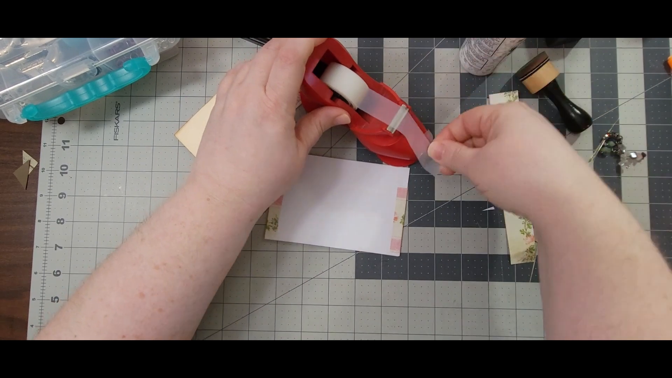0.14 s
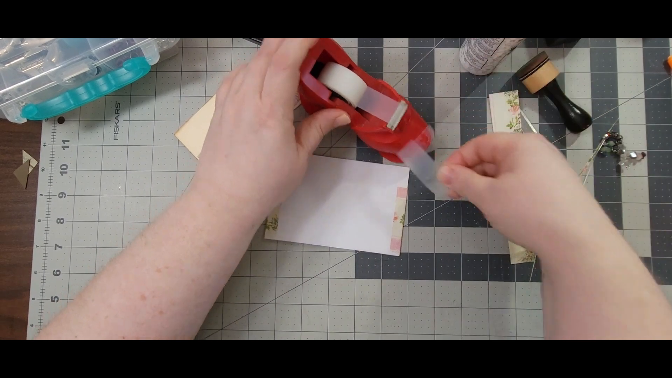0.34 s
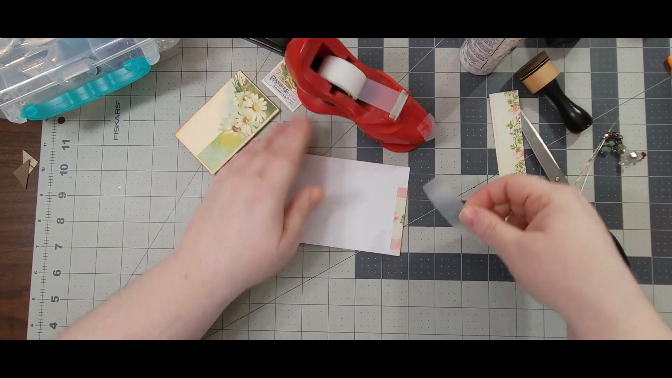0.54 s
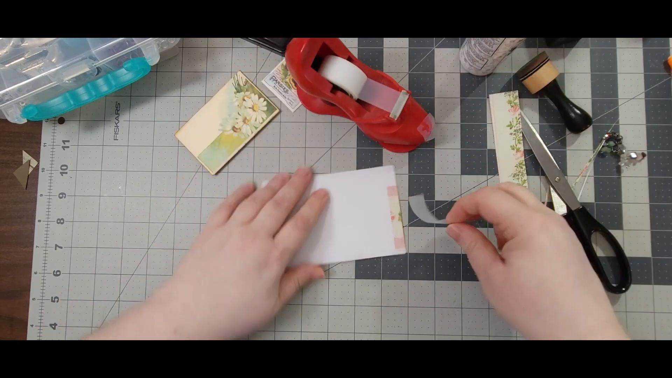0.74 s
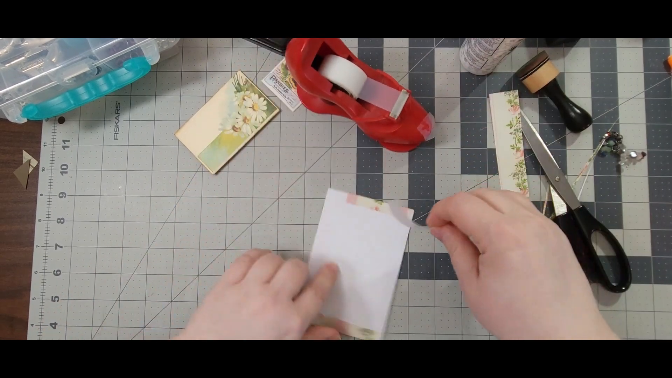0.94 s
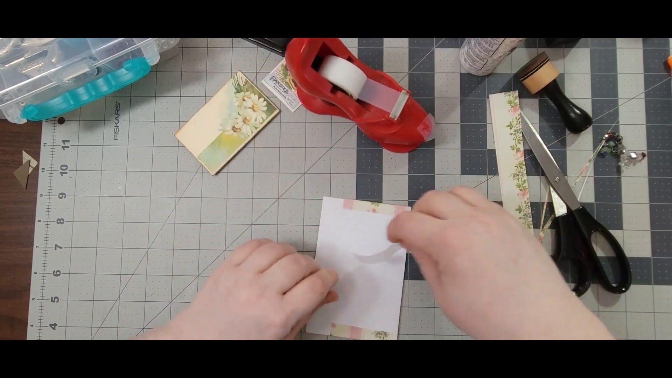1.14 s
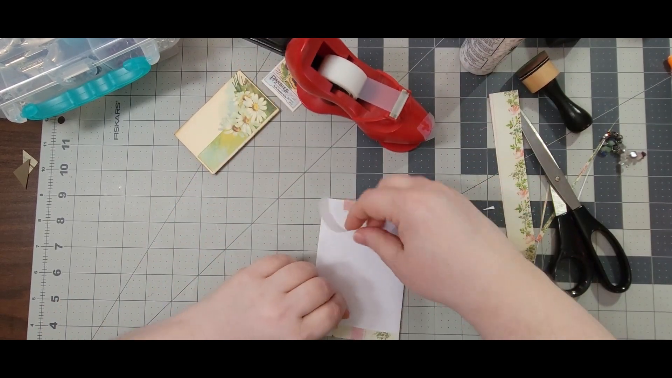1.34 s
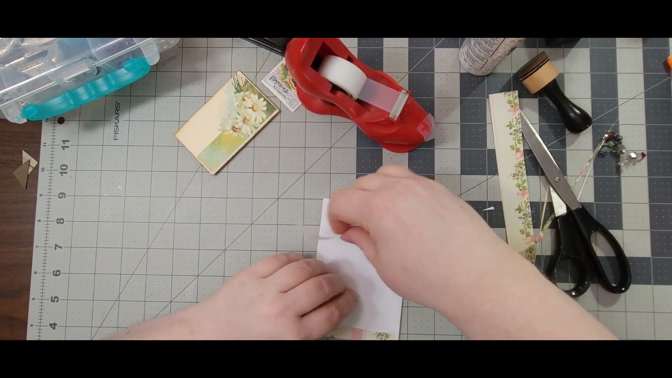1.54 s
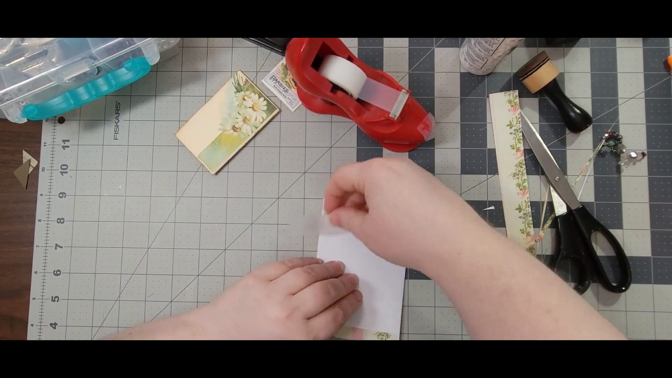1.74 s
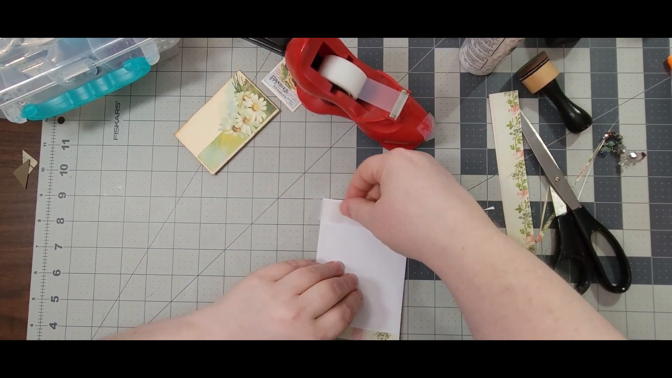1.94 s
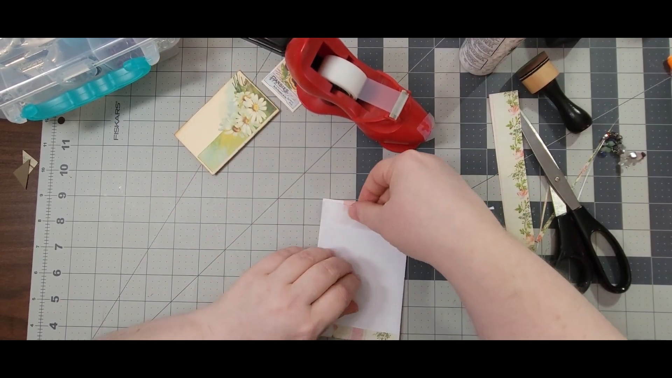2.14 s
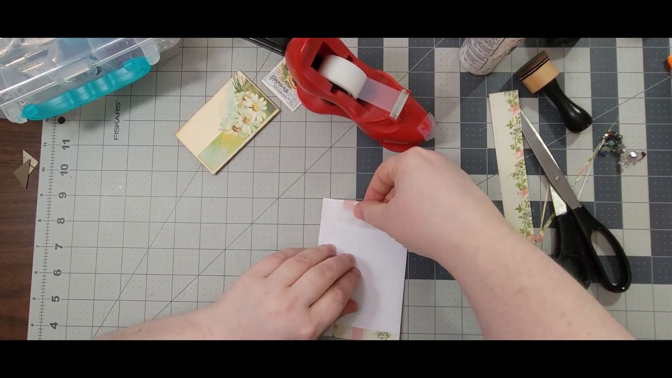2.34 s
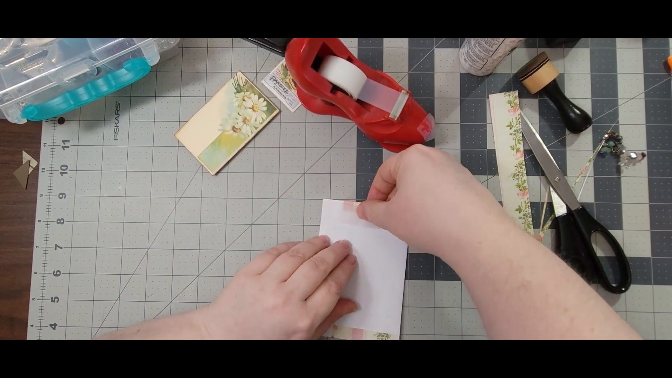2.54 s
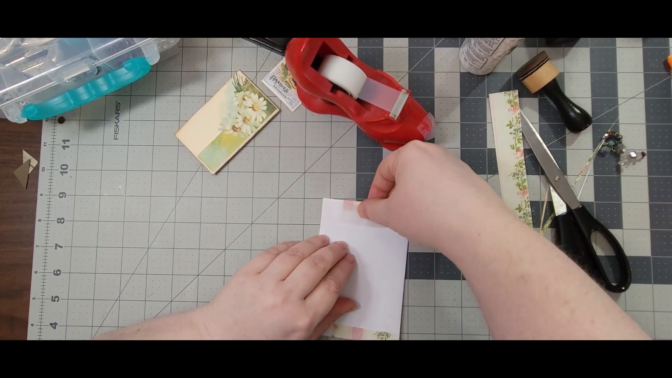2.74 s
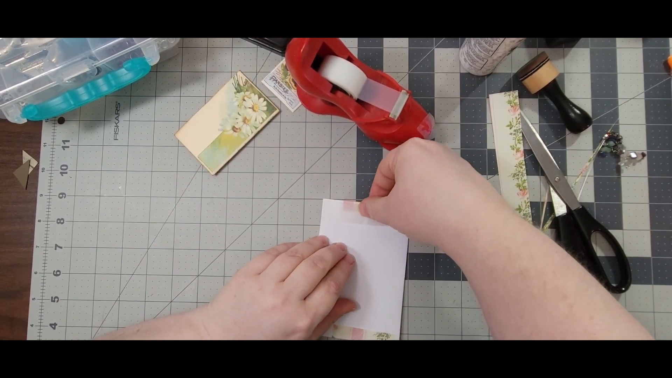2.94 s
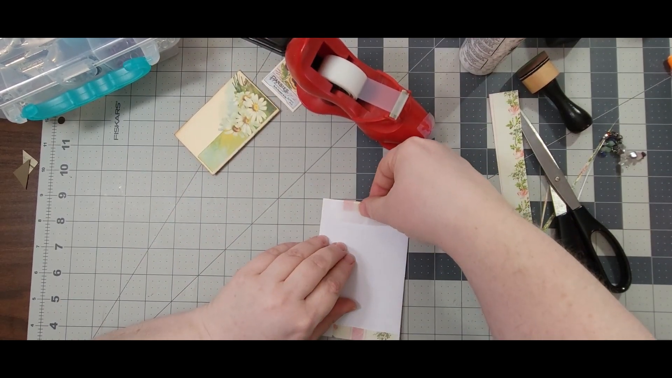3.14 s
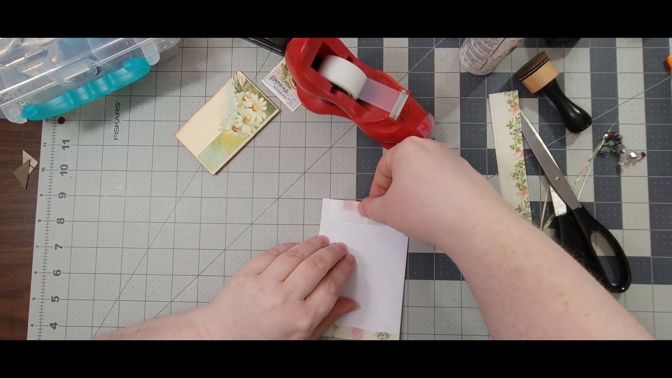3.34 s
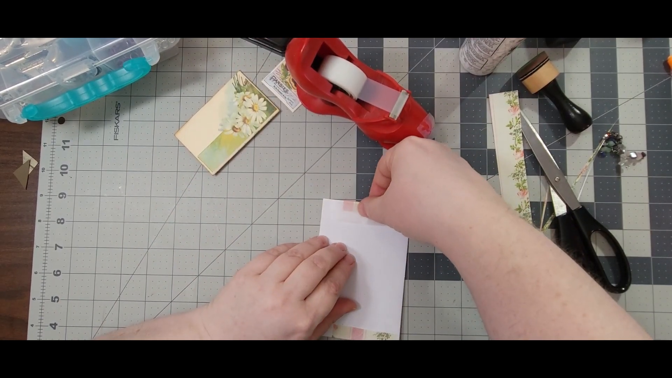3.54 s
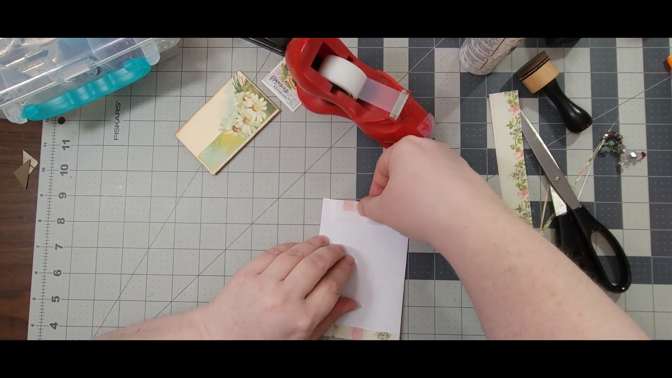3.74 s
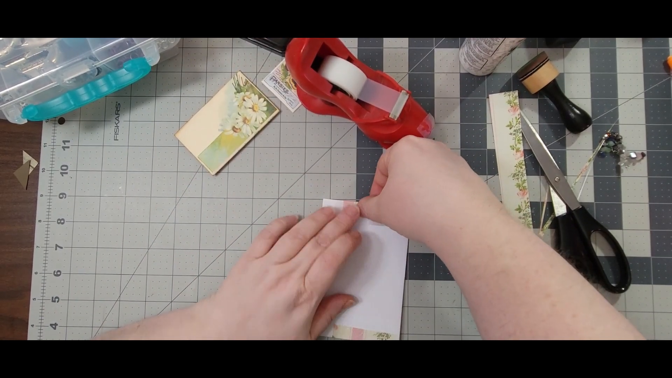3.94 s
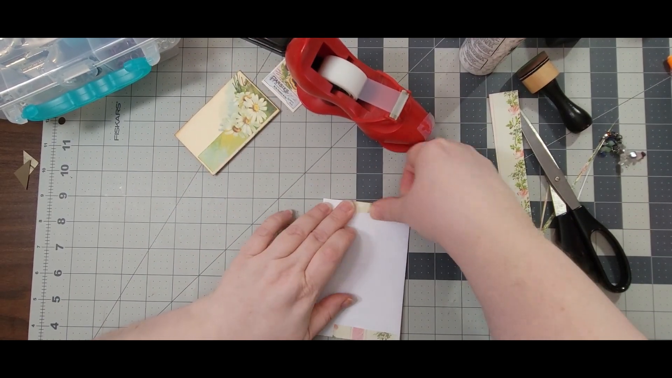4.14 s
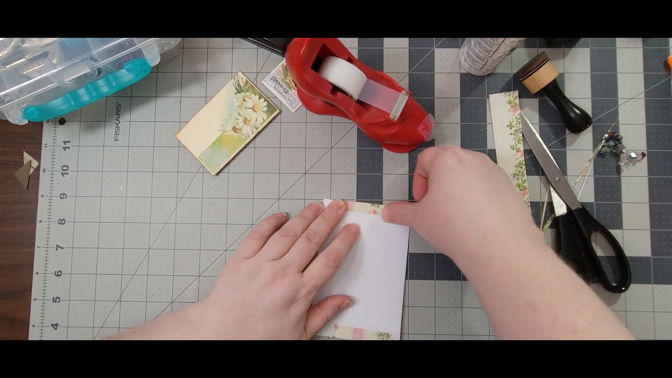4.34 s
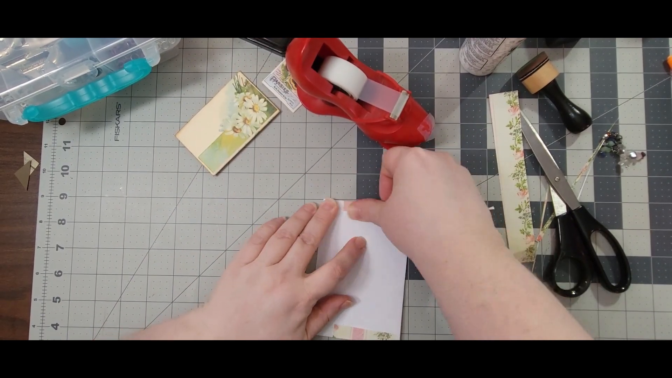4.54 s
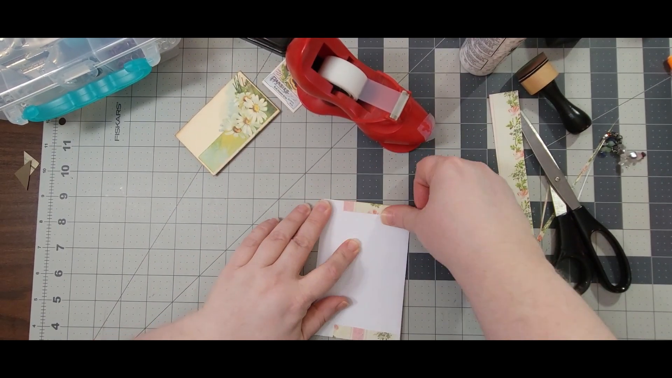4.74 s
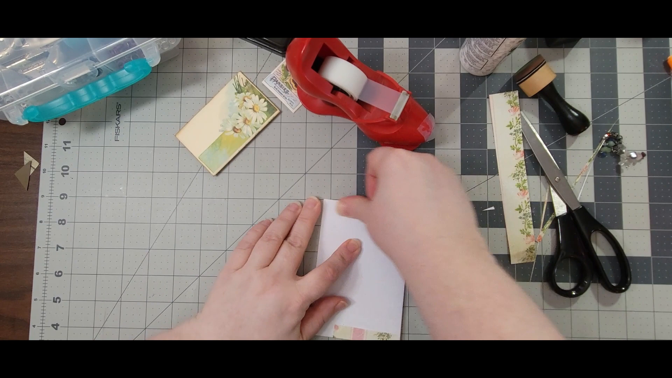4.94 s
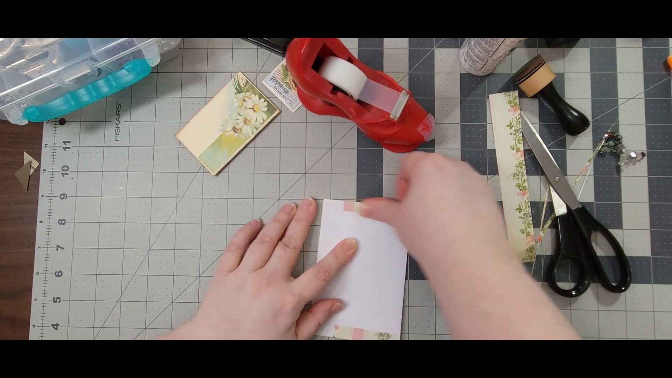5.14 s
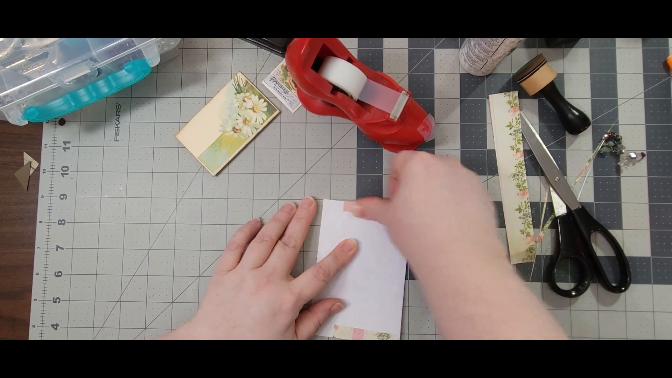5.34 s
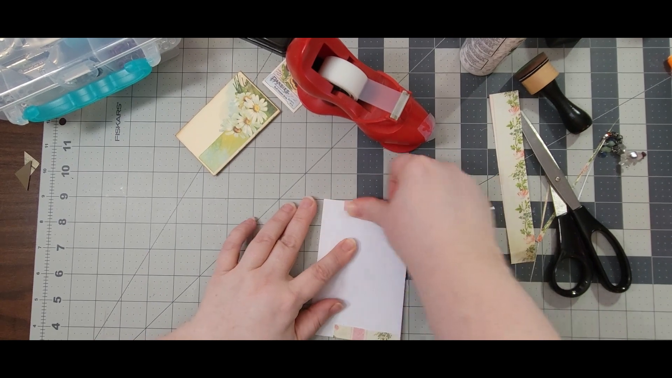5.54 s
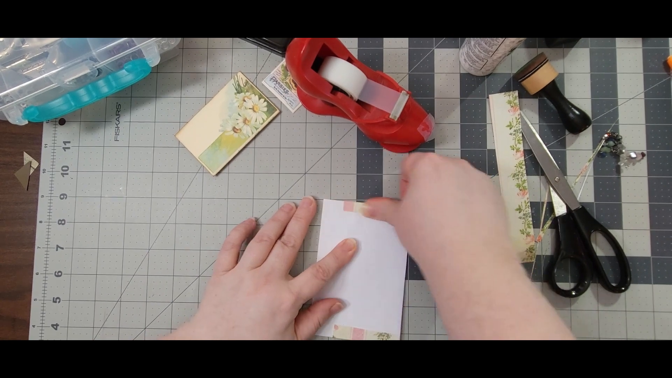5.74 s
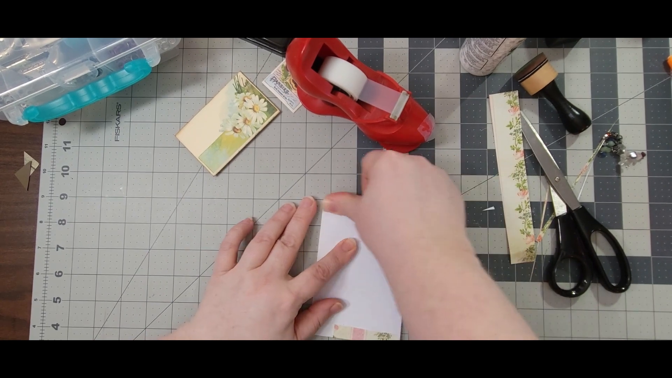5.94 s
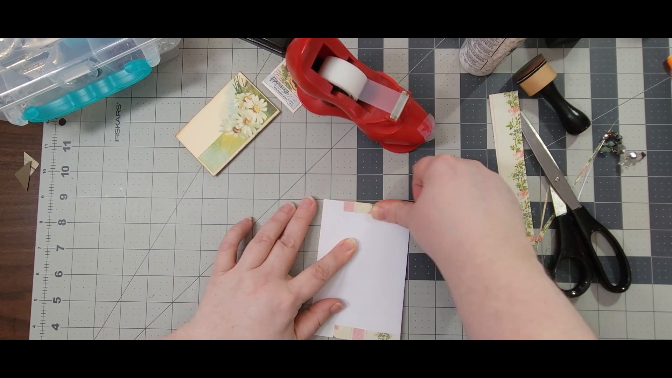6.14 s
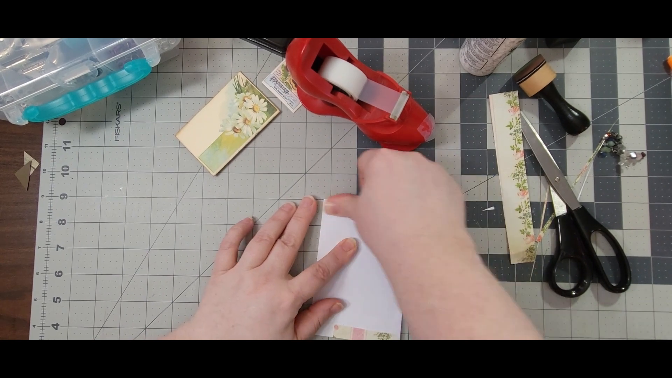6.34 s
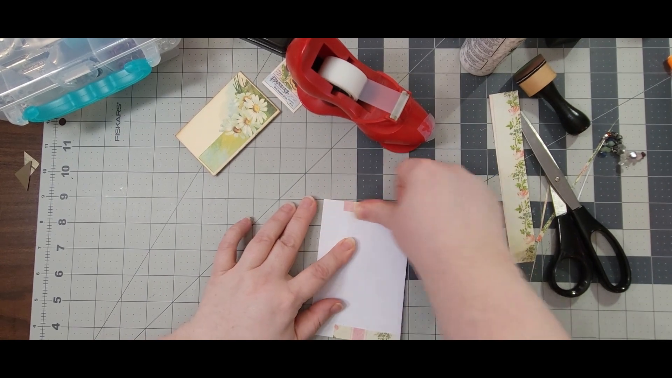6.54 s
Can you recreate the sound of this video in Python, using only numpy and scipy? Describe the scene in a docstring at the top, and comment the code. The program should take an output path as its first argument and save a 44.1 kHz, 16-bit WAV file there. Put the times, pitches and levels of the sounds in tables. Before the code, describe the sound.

In a small room with a steady low hum, tape is tugged and torn from a plastic dispenser with a loud bright crackle. A firm table knock follows, then card hisses across a mat. Thin film rustles and ticks between fingers, one sharp snap sounds midway, and a thumb rubs the tape in soft quick strokes with dull little bumps. Close stereo microphone; the level dips after loud peaks.

```python
"""A hum fills a small room, and at once tape is tugged and torn off a plastic desk dispenser with a sharp crackle.
A card is slid and turned on a cutting mat, then the strip is laid on it and rubbed down with a thumb.
Rubbing, rustling and tearing are noise shaped in pitch and loudness; snaps are very short bursts of noise.
Bumps are pushes that ring the table top; the appliance is wavering tones plus fan noise.
The recorder turns itself down after loud peaks and recovers slowly."""
import sys
import numpy as np
from scipy import signal
from scipy.fft import rfft, irfft, next_fast_len
from scipy.io import wavfile

SR = 44100
rng = np.random.default_rng(int(sys.argv[2]) if len(sys.argv) > 2 else 0)


def bounce(signal):
    """Save signal as a 16-bit WAV file at the path given by the first command-line argument."""
    frames = np.transpose(np.atleast_2d(signal))
    limited = np.clip(frames, -1, 1)
    pcm = np.round(limited * 32767).astype(np.int16)
    wavfile.write(sys.argv[1], SR, pcm)


N = 290597

# motor tones: (pitch [Hz], level [dB])
HUM_TONES = [(59.2, -38.5), (120, -33), (296, -58.5)]
# fan noise: (frequency [Hz], relative level per Hz [dB])
FAN_SPECTRUM = [(15, -61), (30, -40), (45, -17.5), (80, -13.5), (120, -11.5), (150, -25), (330, -33.5),
                (560, -42.5), (780, -52), (1050, -48.5), (1400, -50), (1950, -52), (2250, -66.5),
                (4500, -69.5), (7500, -79.5), (11000, -77.5), (12000, -69.5), (16000, -75)]
# casing resonances in the fan noise: (frequency [Hz], width of each of two filters [Hz], level [dB])
CASING_RESONANCES = [(220, 10, -63), (388, 20, -68), (441, 14, -68), (645, 20, -73), (900, 40, -72),
                     (1030, 50, -75), (1670, 110, -65), (1340, 40, -80), (1860, 50, -82), (2330, 40, -86),
                     (3285, 70, -83), (3620, 350, -82), (9200, 1100, -84)]
# how alike the noise is left and right: (frequency [Hz], likeness [-1 to 1])
EAR_LIKENESS = [(60, .99), (130, .975), (290, .85), (640, .8), (1400, .3), (3100, .1), (6800, -.1),
                (15000, .05)]
# rustles of the strip between fingers:
# (peak time [s], level [dB], duller part compared with it [dB], rise [dB/s], fall [dB/s])
RUSTLES = [(.035, -61, -8, 350, 198), (.165, -56.5, -4.5, 300, 100.5), (1.08, -61, -1, 405, 122),
           (1.174, -37, -10, 1500, 497.5), (1.308, -56, -5.5, 143, 331), (1.385, -73.5, 2, 200, 91.5),
           (1.51, -62, -7, 248.5, 60), (1.568, -46, -3, 900, 500), (1.61, -63.5, -7, 300, 118),
           (1.703, -44.5, -15.5, 412, 598), (1.799, -47, -7, 500, 350.5), (1.87, -48, -14.5, 250, 349.5),
           (1.96, -53.5, -6, 144, 119.5), (2.125, -64, 0, 202, 129), (2.335, -59.5, -12.5, 140.5, 97),
           (2.46, -46, -17.5, 333.5, 260.5), (3.79, -57.5, -9, 331, 200), (3.984, -40, -5.5, 1208, 698),
           (4.03, -43, -7, 596, 896), (4.045, -18, -18.5, 5000, 455), (4.101, -53.5, -6, 603, 64),
           (4.225, -50.5, -9, 107, 204.5), (4.3, -72, -23, 1503, 502)]
# bright noise of bending film: (frequency [Hz], relative level per Hz [dB])
FILM_SPECTRUM = [(4120, -64.5), (7000, -13.5), (8970, 6.5), (10600, -2.5), (12500, 4), (15000, -1.5),
                 (15600, 3)]
# hands bumping or scuffing the table: (time [s], level [dB], contact spread [s], brightness [Hz])
TABLE_BUMPS = [(.045, -30, .0006, 1200), (.21, -26, .015, 1200), (.4505, -6, .0003, 1500),
               (.4575, -16, .0002, 1200), (.469, -17, .001, 900), (.546, -36, .005, 1000),
               (.77, -38, .005, 800), (.935, -40, .008, 1600), (.958, -33, .009, 1100),
               (2.5, -46, .03, 2000), (3.79, -40, .018, 550), (4.377, -37, .007, 800),
               (4.475, -46, .012, 2200), (5.36, -45, .012, 2200), (5.982, -35, .009, 2200),
               (6.25, -46, .012, 2200), (4.452, -40, .02, 500), (4.87, -32, .009, 520),
               (5.06, -39, .007, 400), (5.775, -40, .01, 500), (5.99, -35, .014, 650),
               (6.02, -36, .016, 800), (6.215, -40, .02, 600), (6.467, -28, .007, 380),
               (6.478, -48, .012, 1600)]
# ringing modes of the table top: (frequency [Hz], relative level [dB], time to fall by 60 dB [s])
TABLE_MODES = [(112, 0, .075), (200, -5, .05), (290, -4, .035), (370, -1, .035), (480, 0, .03),
               (620, -6, .03), (950, -11, .03), (1320, -11, .03), (1600, -14, .03)]
# sticky snaps of tape and card:
# (time [s], level [dB], crack above [Hz], mid part compared with it [dB], spread [s], left-right [dB])
STICKY_SNAPS = [(0.0456, -17.5, 3850, 0.5, 0.0064, -1.5), (.12, -50, 4460, 18, 0.0034, -4),
                (0.188, -14, 6200, -19, 0.0055, 8), (0.1893, -10, 6200, -3, 0.0015, 6),
                (0.192, -7, 10400, -2, 0.0018, -5), (0.1927, 3.5, 7400, -16, 0.0024, -6),
                (0.2005, 3, 10500, -2, 0.0013, 15), (0.204, 3.5, 6070, -2, 0.0028, -4),
                (0.2231, -2, 9000, -3, 0.0015, -15), (0.2301, -5, 5000, -8, 0.0015, -7),
                (0.383, -34.5, 4500, 12.5, 0.0096, 2), (.4014, -36, 8000, -8, 0.0028, 1),
                (0.449, -17.5, 5760, 3.5, 0.01, -2.5), (0.507, -32.5, 6000, 2, 0.0022, -2),
                (0.527, -18.5, 4000, -19, 0.0012, -1), (0.543, -26, 4500, 2, 0.01, 2.5),
                (0.639, -47, 4500, -4, 0.0034, -16), (0.696, -29, 6000, -4, 0.001, -9),
                (0.91, -22.5, 9100, 0, 0.0073, 2), (1.175, -22.5, 4470, -8, 0.006, 0),
                (1.205, -45, 4500, 1, .006, 0), (1.569, -23, 7000, -10, 0.0047, 0),
                (1.8027, -34.5, 4470, -7.5, 0.0025, 7), (3.8, -45.5, 4420, -15.5, 0.0093, 5.5),
                (3.985, -22.5, 6500, -15, 0.0046, 3.5), (4.0414, -2, 8500, -21, .0003, 1),
                (4.0422, -11, 9800, -25, .0004, 0), (4.044, -17, 8300, -20, .0005, 0),
                (4.0462, -17, 8300, -25, .0004, 0), (4.0493, -21, 8300, -20, .0005, 0),
                (4.7108, -19, 6000, -24, .002, -2), (5.112, -32.5, 7100, -18, 0.0027, -4),
                (5.35, -40, 3520, -14, .004, 0), (5.408, -37, 3500, -5, .003, 0),
                (5.538, -32.5, 6600, -12, 0.003, 0), (5.98, -41.5, 3480, 6.5, 0.008, 3)]
# tiny high ticks of film peeling off skin: (time [s], level [dB])
PEEL_TICKS = [(1.699, -32), (1.707, -35), (1.778, -29), (1.788, -33), (1.796, -33), (1.809, -32),
              (1.848, -33), (1.857, -34), (1.873, -30), (1.881, -32)]
# sound shared by all ticks: (crack above [Hz], mid part compared with it [dB], spread [s], left-right [dB])
PEEL_TICK_SOUND = (10000, -22, .0015, 0)
# tape pulled against the teeth, a first tug and the rip:
# (time [s], length [s], crackle level [dB], dispenser ring level [dB])
TEARS = [(0.047, 0.0051, -41.5, -30.5), (0.191, 0.044, -6.5, -16)]
# ringing of the hollow dispenser: (frequency [Hz], width of the narrower filter [Hz], relative level [dB])
DISPENSER_RESONANCES = [(480, 100, -13), (650, 90, -5), (1178, 140, -1), (1660, 120, 6), (2540, 300, -4),
                        (3500, 260, 0), (4350, 300, -9), (5400, 450, -1)]
# noise of tearing film: (frequency [Hz], relative level per Hz [dB])
CRACKLE_SPECTRUM = [(1760, -39.5), (3000, -3), (4410, -4), (4800, -10.5), (5470, 9), (6770, -1), (12600, 3),
                    (15600, 3.5)]
# card on the mat, one list for a push and one for a turn:
# (time [s], level [dB], low scrape compared with it [dB])
CARD_SLIDES = [
    [(0.35, -46.5, -3), (0.44, -43, -4.5), (0.46, -41.5, 19.5), (0.502, -34.5, -10.5), (0.552, -48.5, 3.5),
     (0.6, -73, -1.5)],
    [(0.61, -58, -10), (0.642, -38.5, -2.5), (0.7, -43, -27), (0.833, -32, -16.5), (0.84, -27.5, -21),
     (0.856, -19.5, -21), (0.878, -30.5, -15), (0.954, -32, -11.5), (1.08, -72.5, 0)],
]
# hiss of card on mat: (frequency [Hz], relative level per Hz [dB])
MAT_SPECTRUM = [(1290, -22.5), (2200, -6), (3200, 2), (4380, -0.5), (5200, -1), (6280, 0), (10900, -2.5),
                (15600, 2)]
# thumb strokes to and fro along the tape: (start [s], length [s], hiss level [dB],
# low drag compared with the hiss [dB], card scuff level [dB], hiss timing [1 peaks midway, less is earlier])
THUMB_STROKES = [(4.359, 0.25, -46, -14.5, -68, 0.53), (4.595, 0.17, -45.5, -11, -87, 0.79),
                 (4.797, 0.24, -42, -11.5, -57, 0.64), (5.045, 0.21, -44.5, -12, -64, 1),
                 (5.29, 0.18, -45.5, -9, -56.5, 0.78), (5.5, 0.18, -44.5, -12, -62.5, 0.93),
                 (5.72, 0.24, -47, -9, -63, 0.73), (5.955, 0.22, -43.5, -12.5, -58, 0.9),
                 (6.196, 0.24, -47, -8.5, -60, 0.76), (6.453, 0.22, -43, -14.5, -61, 0.85)]
# hiss of skin on tape: (frequency [Hz], relative level per Hz [dB])
SKIN_SPECTRUM = [(2060, -57), (3500, -24), (4810, -8), (6580, -8), (8780, 2), (11000, -2), (12200, 4),
                 (15600, 2)]

FAN_DB = -40
LEFT_LAG_S = .0001  # the hum reaches the left microphone later
SCUFF_DB = -10  # skin dragging, heard directly beside the ring of the table
# a snap rings a little above the edge of its crack; both shares multiply that edge
RING_ABOVE_EDGE, RING_WIDTH_SHARE, RING_DB = 1.17, .16, 4
# a weaker creak that swells before each tear and fades after it
STRAIN_DB, STRAIN_RISE_DB_PER_S, STRAIN_FALL_DB_PER_S, STRAIN_RING_DB = -24, 2499.5, 190.5, -17
BITE_DB_PER_S, LET_GO_DB_PER_S, RING_GROWS_DB_PER_S, CRACKLE_SAGS_DB_PER_S = 2800, 649.5, 169, 90
HISS_STEEP, DRAG_EARLY, DRAG_STEEP = 1.76, 0.9, 1  # powers that shape the loudness of a stroke
RESTING_DB, RESTING_DRAG_DB = -73.5, -75.5  # faint steady rubbing from the first stroke on
ROOM_T60_S, ROOM_DB = 0.21, -15.5
WALL_CUT_HZ = 8000  # treble cutoff of the echo for each 50 ms it travels
# the left microphone port lifts the top, the right one dulls it
PORT_HZ, PORT_WIDTH_HZ, PORT_SHARE = 12800, 3500, .3
DUCK_ABOVE_DB, DUCK_SHARE, DUCK_MOST_DB = -14, .72, 9.5
ATTACK_S, RECOVER_DB_PER_S = .004, 27
CUTOFF_HZ = 15700


def amp(db):
    """Turn decibels into a plain multiplier."""
    return 10 ** (np.asarray(db) / 20)


def rms_one(x):
    """Scale a sound to an average strength (rms) of 1."""
    return x / np.sqrt(np.mean(x ** 2) + 1e-20)


def in_time(rows, count=1):
    """Draw each table column over time; the first count of them are levels, silent outside the table."""
    s, *columns = np.transpose(rows)
    t = np.arange(N) / SR
    outside = (t < s[0]) | (t > s[-1])
    curves = []
    for k, column in enumerate(columns):
        curve = np.interp(t, s, column)
        curves.append(np.where(outside & (k < count), -140, curve))
    return curves


def at_hz(points, hz):
    """Read a table between its points, with frequency on a musical (logarithmic) scale."""
    table_hz, values = np.array(points)[:, 0], np.array(points)[:, 1]
    return np.interp(np.log(hz), np.log(table_hz), values)


def drift(rate):
    """Smooth random wandering with spread 1; rate is in Hz."""
    # made at one fortieth of the sample rate, then joined by straight lines
    r = np.exp(-80 * np.pi * rate / SR)
    chance = rng.standard_normal(N // 40 + 2002)
    slow = signal.lfilter([1], [1, -2 * r, r * r], chance)[2000:]
    return np.interp(np.arange(N) / 40, np.arange(len(slow)), rms_one(slow))


def band(x, low_hz, high_hz):
    """Keep only the frequencies between two edges."""
    edges = [low_hz, min(high_hz, .45 * SR)]
    return signal.sosfilt(signal.butter(2, edges, "band", fs=SR, output="sos"), x + 1e-18)


def resonance(x, hz, width_hz):
    """Favour one frequency, as a body does that rings there."""
    r = np.exp(-np.pi * width_hz / SR)
    feedback = [1, -2 * r * np.cos(2 * np.pi * hz / SR), r * r]
    return signal.lfilter([(1 - r * r) / 2, 0, (r * r - 1) / 2], feedback, x + 1e-18)


def colour(x, spectrum):
    """Shape bass and treble smoothly by a table; the result has rms 1."""
    hz = np.maximum(np.arange(N // 2 + 1) * SR / N, 1)
    return rms_one(irfft(rfft(x) * amp(at_hz(spectrum, hz)), N))


def stereo_noise():
    """White noise that both microphones hear alike in the bass, each its own in the treble."""
    mid, side = rfft(rng.standard_normal((2, N)))
    hz = np.maximum(np.arange(len(mid)) * SR / N, 1)
    alike = np.clip(at_hz(EAR_LIKENESS, hz), -1, 1)
    opposite = np.array([[1], [-1]])
    return irfft(np.sqrt(1 + alike) * mid + np.sqrt(1 - alike) * side * opposite, N)


def friction(uneven_db, grain_hz, catches_per_s):
    """Countless tiny slips of uneven strength; now and then a fibre catches and lets go harder."""
    strength = np.minimum(rng.exponential(0.82, N), 5)
    catches = (rng.random(N) < catches_per_s / SR) * strength
    # each catch dies away within about half a millisecond
    catches = signal.lfilter([1], [1, -np.exp(-1 / (0.00054 * SR))], catches)
    return stereo_noise() * amp(uneven_db * drift(grain_hz)) * (1 + catches)


def swell(s, length_s, rise_db_per_s, fall_db_per_s, grow_db_per_s=0):
    """Loudness that climbs to 1 at s, grows over the length and dies away."""
    t = np.arange(N) / SR - s
    rise = rise_db_per_s * np.minimum(t, 0)
    grow = grow_db_per_s * np.clip(t, 0, length_s)
    fall = fall_db_per_s * np.maximum(t - length_s, 0)
    return amp(rise + grow - fall)


def arc(s, length_s, early, steep):
    """Speed of one stroke from rest to rest; early under 1 brings the top forward."""
    done = np.clip((np.arange(N) / SR - s) / length_s, 0, 1)
    return np.abs(np.sin(np.pi * done ** early)) ** steep


def patchy(x, depth_db, per_s):
    """Every half octave swells and sinks on its own, as the touching patch keeps changing."""
    edges = 700 * 2 ** np.arange(0, 5, .5)
    total = 0
    for k, (low, high) in enumerate(zip(edges, edges[1:])):
        # every other band is flipped
        total = total + amp(depth_db * drift(per_s)) * band(x, low, high) * (-1) ** k
    return rms_one(total)


def appliance():
    """Motor tones that waver a little, over fan noise and its casing resonances that come and go."""
    t = np.arange(N) / SR - np.array([[LEFT_LAG_S], [0]])
    tones = casing = 0
    for hz, db in HUM_TONES:
        loudness = np.sqrt(2) * amp(db + 0.84 * drift(0.94))
        cycles = hz * t + rng.random() + 0.046 * drift(0.68)
        tones = tones + loudness * np.sin(2 * np.pi * cycles)
    noise = stereo_noise()
    for hz, width, db in CASING_RESONANCES:
        ringing = resonance(resonance(noise, hz, width), hz, width)
        casing = casing + amp(db + 2.5 * drift(8)) * rms_one(ringing)
    fan = amp(FAN_DB + 2.3 * drift(9.3)) * colour(stereo_noise(), FAN_SPECTRUM)
    return tones * amp([[.3], [-.3]]) + fan + casing


def flex():
    """The thin film rustles as it bends and peels off the skin; wider bends sound duller."""
    grains = friction(uneven_db=1.0, grain_hz=60, catches_per_s=85)
    bright = dull = 0
    for s, level_db, dull_db, rise_db_per_s, fall_db_per_s in RUSTLES:
        rustle = amp(level_db) * swell(s, 0, rise_db_per_s, fall_db_per_s)
        bright = bright + rustle
        dull = dull + amp(dull_db) * rustle
    return bright * colour(grains, FILM_SPECTRUM) + dull * rms_one(band(grains, 2500, 7540))


def bumps():
    """Rough contacts ring the table top, each mode by its own chance; softer skin scuffs and sounds duller."""
    out, t = np.zeros(N + 9000), np.arange(9000) / SR
    contacts = rng.standard_normal((len(TABLE_BUMPS), len(t)))
    modes = []
    for k, (hz, db, t60) in enumerate(TABLE_MODES):
        modes.append(amp(db - 60 * t / t60) * np.sin(2 * np.pi * hz * t) * (-1) ** k)
    modes = np.array(modes)
    for (s, db, spread_s, bright_hz), contact in zip(TABLE_BUMPS, contacts):
        firm = np.exp(-spread_s / .002)  # share of one clean push against rough rubbing
        push = (firm + .5 * contact) * t * np.exp(-t / max(spread_s, .0002))
        table_top = amp(3 * (1 - firm) * contact[-len(TABLE_MODES):]) @ modes
        ring = signal.fftconvolve(push, table_top)[:len(t)]
        ring = signal.sosfilt(signal.butter(2, bright_hz, fs=SR, output="sos"), ring)
        scuff = band(push, 200, bright_hz)
        scuff = amp(SCUFF_DB) * (1 - firm) * scuff / np.abs(scuff).max()
        out[round(s * SR):][:len(t)] += amp(db) * (ring / np.abs(ring).max() + scuff)
    return out[:N]


def snaps():
    """Each snap is a quickly dying burst of tearing glue; the shortest begin with one clean tick."""
    out, t = np.zeros((2, N)), np.arange(1300) / SR
    rows = STICKY_SNAPS + [(s, db, *PEEL_TICK_SOUND) for s, db in PEEL_TICKS]
    bursts = rng.standard_normal((len(rows), 2, len(t)))
    for (s, db, crack_hz, mid_db, spread_s, pan_db), burst in zip(rows, bursts):
        tick = 6 * np.exp(-spread_s / .001) * (t == 0)
        burst = (burst + tick) * np.exp(-t / np.clip(spread_s, .0003, .008))
        bright = band(band(burst, crack_hz, 16000), crack_hz, 16000)
        mid = band(burst, 1150, 4200)
        ring = resonance(bright, RING_ABOVE_EDGE * crack_hz, RING_WIDTH_SHARE * crack_hz)
        bright = bright + amp(RING_DB) * ring
        bright = bright / np.abs(bright).max(axis=1, keepdims=True)
        both = bright + amp(mid_db) * mid / np.abs(mid).max()
        at = round(s * SR)
        out[:, at:at + len(t)] += amp(db) * both * amp([[pan_db / 2], [-pan_db / 2]])
    return out


def tear():
    """The teeth rip the film in dense crackle and shake the hollow plastic body."""
    rip = friction(uneven_db=1.5, grain_hz=220, catches_per_s=220)
    body = crackle = ring = 0
    for k, (hz, width, db) in enumerate(DISPENSER_RESONANCES):
        ringing = resonance(resonance(rip, hz, 3 * width), hz, width)
        body = body + amp(db + 2.8 * drift(40)) * ringing * (-1) ** k
    for s, length_s, crackle_db, ring_db in TEARS:
        strain = amp(STRAIN_DB) * swell(s, length_s, STRAIN_RISE_DB_PER_S, STRAIN_FALL_DB_PER_S)
        bite = swell(s, length_s, BITE_DB_PER_S, LET_GO_DB_PER_S, -CRACKLE_SAGS_DB_PER_S)
        shake = swell(s, length_s, BITE_DB_PER_S, LET_GO_DB_PER_S, RING_GROWS_DB_PER_S)
        crackle = crackle + amp(crackle_db) * (bite + strain)
        ring = ring + amp(ring_db) * (shake + amp(STRAIN_RING_DB) * strain)
    # the crackle is a little louder on the left
    return crackle * colour(rip, CRACKLE_SPECTRUM) * amp([[1.2], [-1.2]]) + ring * rms_one(body)


def slide():
    """Card fibres hiss over the mat, with a lower scrape of the whole sheet."""
    grains = friction(uneven_db=0.5, grain_hz=120, catches_per_s=50)
    hiss = patchy(colour(grains, MAT_SPECTRUM), depth_db=2.5, per_s=41)
    scrape = rms_one(band(grains, 360, 2700))
    out = 0
    for level_db, low_db in map(in_time, CARD_SLIDES):
        out = out + amp(level_db) * (hiss + amp(low_db) * scrape)
    return out


def rub():
    """Skin on smooth tape hisses brightly at every stroke; the pressing thumb also scuffs the card on the mat."""
    grains = friction(uneven_db=1.0, grain_hz=150, catches_per_s=70)
    begun = np.arange(N) / SR > THUMB_STROKES[0][0]
    hiss, drag, scuff = amp(RESTING_DB) * begun, amp(RESTING_DRAG_DB) * begun, 0
    for s, length_s, hiss_db, drag_db, scuff_db, timing in THUMB_STROKES:
        pressing = arc(s, length_s, DRAG_EARLY, DRAG_STEEP)
        hiss = hiss + amp(hiss_db) * arc(s, length_s, timing, HISS_STEEP)
        drag = drag + amp(hiss_db + drag_db) * pressing
        scuff = scuff + amp(scuff_db) * pressing
    hiss_noise = patchy(colour(grains, SKIN_SPECTRUM), depth_db=2.0, per_s=13.0)
    drag_noise = rms_one(band(grains[:, ::-1], 1220, 5600))  # grains played backwards, so not a copy of the hiss
    scuff_noise = rms_one(band(grains, 710, 1740))
    return hiss * hiss_noise + drag * drag_noise + scuff * scuff_noise


def room(x):
    """Echoes from eight feedback delays a side, duller on every round."""
    size = next_fast_len(N + SR)
    w = 2 * np.pi * np.arange(size // 2 + 1) / size
    dull = 1 / (1 + 1j * w * SR / (2 * np.pi * WALL_CUT_HZ))
    response = np.zeros((2, len(w)), complex)
    lags = (rng.uniform(0.011, 0.032, 16) * SR).astype(int)
    for k, lag in enumerate(lags):
        fade = amp(-60 * lag / SR / ROOM_T60_S) * np.abs(dull) ** (lag / SR * 20)
        loop = fade * np.exp(-1j * w * lag)
        response[k % 2] += loop / (1 - loop) * (-1) ** (k // 2)
    return irfft(rfft(x, size) * response, size)[:, :N]


def scene():
    """Hands with their echo in the room, bumps on the table, and the steady hum."""
    hands = tear() + slide() + flex() + rub() + snaps()
    return hands + amp(ROOM_DB) * room(hands) + bumps() + appliance()


def record(dry):
    """Ports colour the treble, gain ducks after peaks; deep bass is lost, peaks are rounded, the top is cut."""
    t = np.arange(N) / SR
    dry = dry + PORT_SHARE * resonance(dry, PORT_HZ, PORT_WIDTH_HZ) * [[1], [-1]]
    level_db = 20 * np.log10(np.abs(dry).max(axis=0) + 1e-9)
    over_db = np.maximum(level_db - DUCK_ABOVE_DB, 0)
    wanted_db = np.minimum(DUCK_SHARE * over_db, DUCK_MOST_DB)
    # hold the deepest cut, letting it recover at a steady pace
    recovered_db = RECOVER_DB_PER_S * t
    held_db = np.maximum.accumulate(wanted_db + recovered_db) - recovered_db
    r = np.exp(-1 / (ATTACK_S * SR))
    ducked = dry * amp(-signal.lfilter([1 - r], [1, -r], held_db))
    no_deep_bass = signal.sosfilt(signal.butter(2, 35, "high", fs=SR, output="sos"), ducked)
    rounded = np.tanh(no_deep_bass / .95) * .95
    return signal.sosfiltfilt(signal.ellip(8, .2, 40, CUTOFF_HZ, fs=SR, output="sos"), rounded)


dry = scene()
out = record(dry)
bounce(out)
```